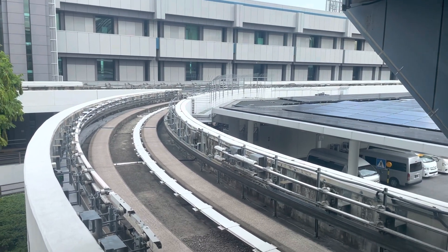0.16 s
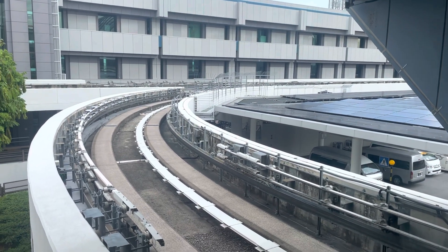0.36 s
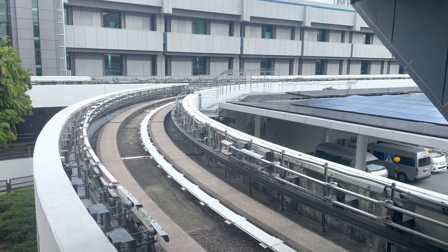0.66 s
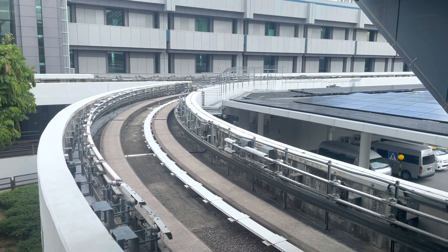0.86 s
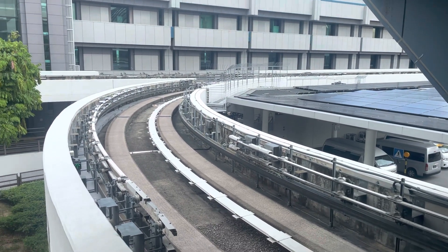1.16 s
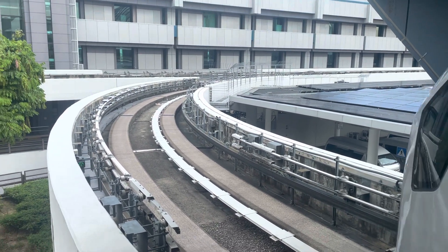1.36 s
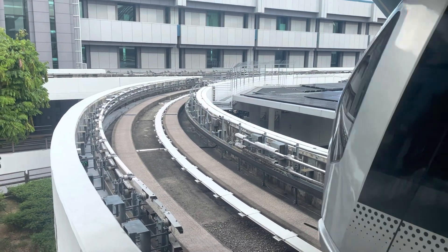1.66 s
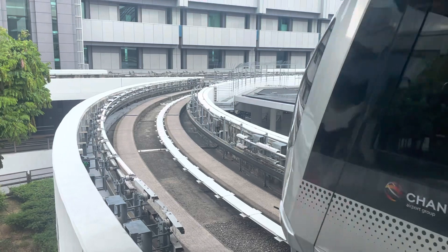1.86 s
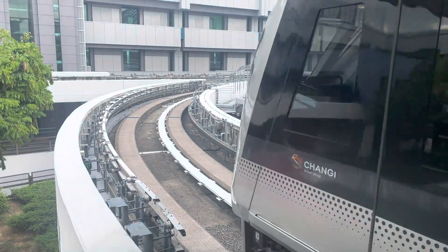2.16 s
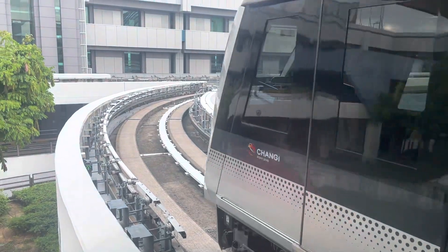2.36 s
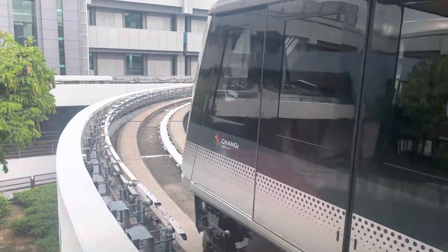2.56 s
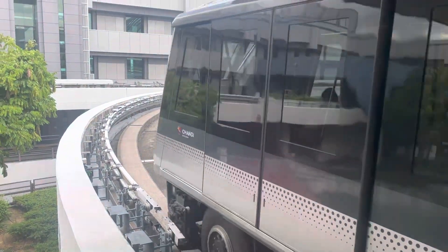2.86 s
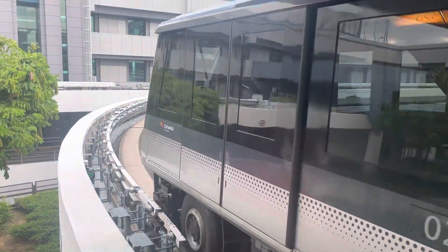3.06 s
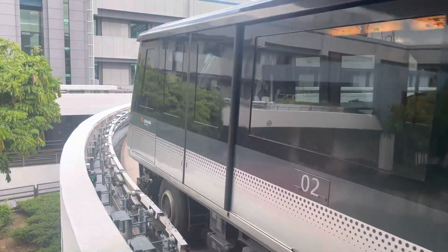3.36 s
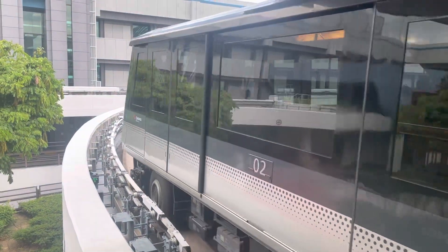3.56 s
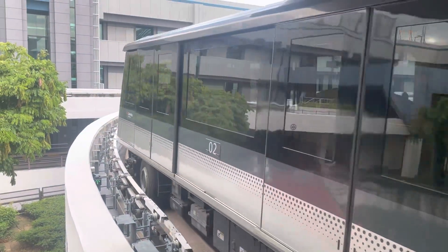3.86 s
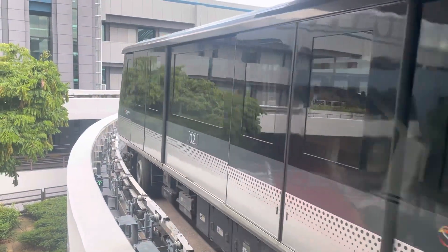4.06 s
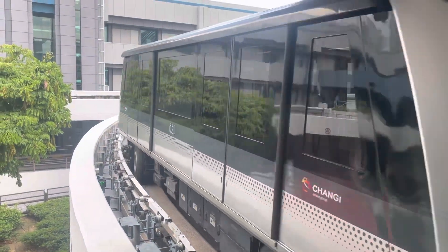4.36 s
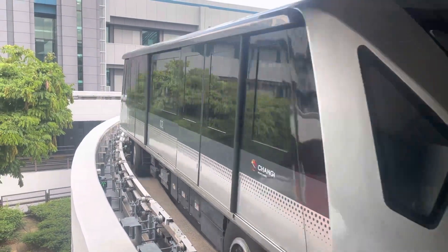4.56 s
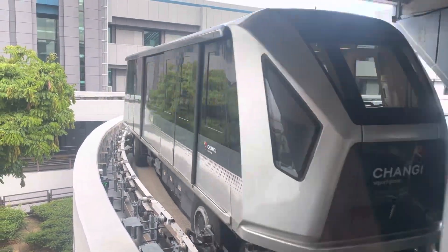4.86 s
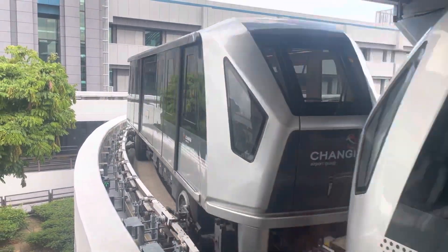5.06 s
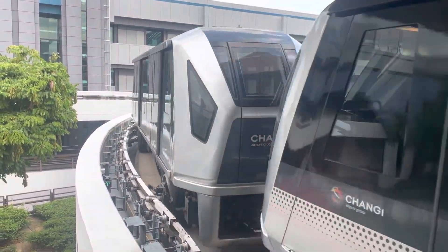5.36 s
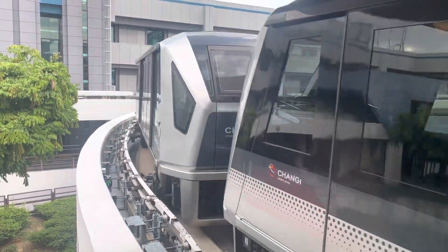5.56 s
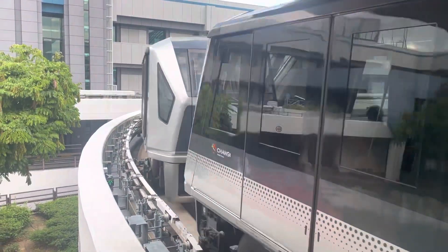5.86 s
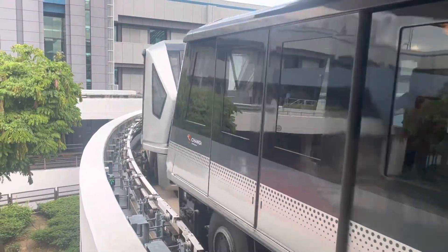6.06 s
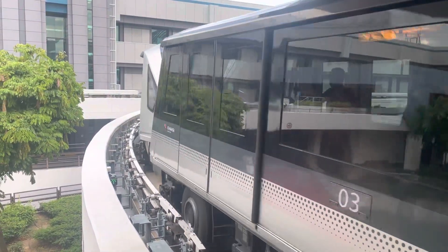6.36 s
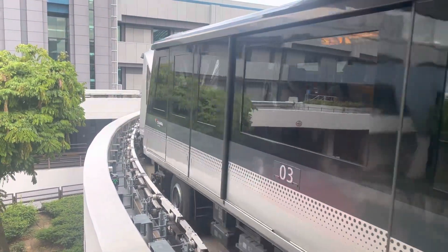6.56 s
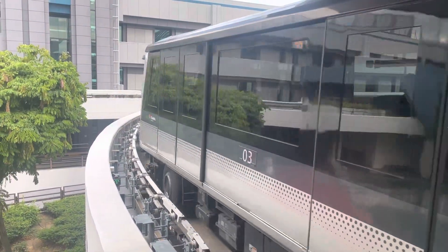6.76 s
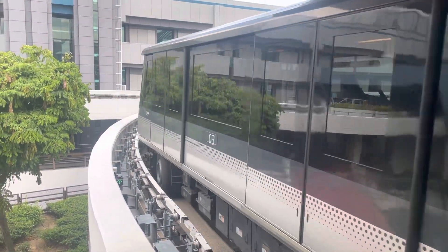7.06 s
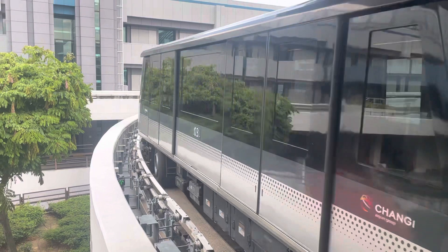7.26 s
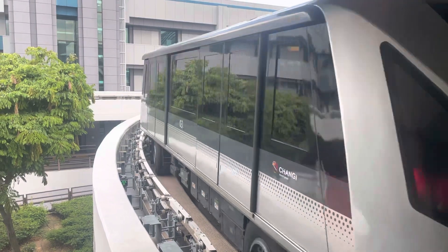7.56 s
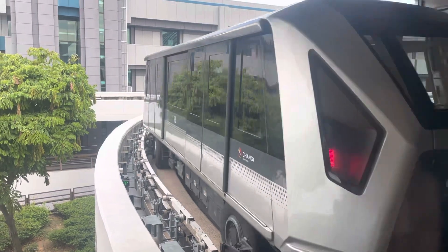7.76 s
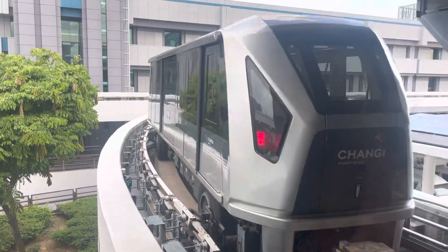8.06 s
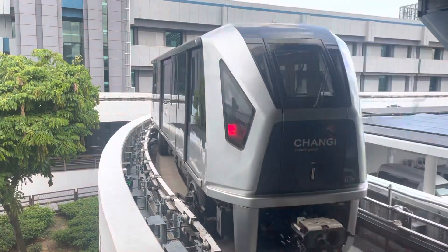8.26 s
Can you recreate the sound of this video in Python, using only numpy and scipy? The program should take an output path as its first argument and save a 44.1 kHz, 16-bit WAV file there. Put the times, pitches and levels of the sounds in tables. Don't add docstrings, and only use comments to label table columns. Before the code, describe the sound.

Outdoors beside a raised concrete guideway, a phone close to the track hears a two-car rubber-tyred train. Low deck rumble and tyre roar run throughout, with wavering motor hum and two broad whines. A thin brake squeal comes early, then soft joint thumps and engine revs from the street; later a small air spit, pump hum and a tiny chirp as the train recedes.

```python
import sys
import numpy as np
from scipy import signal
from scipy.fft import rfft, irfft, next_fast_len
from scipy.io import wavfile
from scipy.ndimage import uniform_filter1d

SR = 44100
rng = np.random.default_rng(int(sys.argv[2]) if len(sys.argv) > 2 else 0)


def master_out(mix):
    frames = np.transpose(np.atleast_2d(mix))
    ceiling = np.clip(frames, -1, 1)
    pcm = np.round(ceiling * 32767).astype(np.int16)
    wavfile.write(sys.argv[1], SR, pcm)


def gain_from_db(level_db):
    decades = np.asarray(level_db, float) / 20
    return 10 ** decades


N = 370440
TIME = np.arange(N) / SR

# t/s, nearness/dB, drive effort/dB
TRAIN = [(0.0, 0, -12.5), (0.5, 1, -15), (0.9, 0.5, -6.5), (1.8, 0.86, -2.5), (2.6, 1.5, -1), (3.6, 0, 1),
         (4.35, 0, -0.5), (5.26, -0.5, -0.2), (5.8, -1, 0), (6.35, -4, 0.5), (7.1, -4.5, -4.5),
         (7.6, -5, -6.5), (8.4, -10.5, -3.5)]
# level/dB, share of nearness [dB/dB], share of effort [dB/dB]
RUMBLE_LAW = (-26.5, 0.902, 0.017)
ROAR_LAW = (-37, 0.57, .03)
HISS_LAW = (-58, 0.52, 0.2)
WHINE_LAWS = [
    (-43.5, .1, 1.3),
    (-46.5, 0.96, .4),
]
FAN_LAW = (-48, 0.61, .03)
MAINS_LAW = (-41.5, .8, .1)
MOTOR_LAW = (-38.5, .5, .05)
OCTAVE_LAW = (-45, 0.71, -0.32)

# f/Hz, level/dB per Hz
RUMBLE = [(15, -40), (25, -18.5), (54, -8), (92, 2), (134, -1), (215, -3), (258, -9.5), (302, -10.5),
          (333, -19.5), (371, -16.5), (450, -18), (580, -47.5), (990, -120)]
# f/Hz, level/dB per Hz
ROAR = [(250, -25), (330, 0.5), (400, -4), (500, -5.5), (700, -5.5), (1000, -7.5), (1500, -14.5),
        (1900, -13), (2600, -19), (3300, -32), (3700, -47)]
# f/Hz, level/dB per Hz
HISS = [(2800, -15.5), (3500, 4.5), (4100, 3.5), (4650, 0.5), (4900, -3), (5600, -5), (7000, -9),
        (8500, -13.5), (9800, -17.5), (12000, -21.5), (13000, -30), (15000, -30), (16000, -33.5)]
# f/Hz, width/Hz, level/dB, steepness of the skirts [exponent]
WHINE_BANDS = [
    (2072, 290, -1.5, 3.3),
    (3004, 610, 2, 3.2),
]
# t/s, peak level/dB, half length/s
JOINTS = [
    (2.17, -27.5, 0.054),
    (2.8, -29, .12),
    (3.25, -27.5, 0.037),
    (3.48, -25, 0.038),
    (3.85, -27.5, .07),
    (4.0, -24, 0.029),
    (4.14, -27, 0.03),
    (4.42, -26.5, 0.057),
    (5.5, -27.5, .05),
]
# t/s, peak level/dB, half length/s
HISS_SWELLS = [
    (1.05, -63, 0.19),
    (1.75, -58.5, 0.3),
    (5.56, -55, .045),
    (7.6, -66, .35),
]

# t/s, peak level/dB, half length/s
FAN_SWELLS = [(0.0, -41, 0.12), (1.1, -40.5, 0.41), (2.8, -41.5, .6), (3.5, -46.5, .3), (4.8, -46, 0.33),
              (5.9, -50, .3), (6.8, -42.5, .2), (7.9, -49, 0.18)]
# t/s, peak level/dB, half length/s
MAINS = [(.6, -39.5, -0.5), (2.3, -37, 0.6), (3.65, -37, .08), (4.5, -34, -0.3), (6.0, -37.5, 1.1)]
# t/s, peak level/dB, half length/s
MOTOR = [(.42, -33.5, .17), (.95, -28.5, 0.17), (2.32, -31, .1), (2.92, -32.5, .13), (3.5, -25, 0.072),
         (3.77, -26, 0.086), (4.07, -31.5, 0.075), (4.36, -35, 0.045), (4.89, -31, 0.15),
         (5.75, -27.5, 0.222), (6.08, -31.5, 0.053), (6.5, -31.5, 0.227), (7.25, -31.5, 0.19)]
# t/s, peak level/dB, half length/s
MOTOR_OCTAVE = [(1.19, -34, 0.075), (1.63, -33.5, .12), (2.11, -36, 0.049), (2.53, -38, .1),
                (2.97, -32.5, .06), (3.73, -33, 0.058), (3.98, -33, .1), (4.35, -32.5, 0.016),
                (4.62, -36.5, .15), (4.94, -35.5, 0.042), (7.5, -44.5, 0.31)]
# t/s, peak level/dB, half length/s
DECK = [
    (1.75, -27.5, 0.095),
    (2.2, -27, 0.12),
    (2.75, -32.5, .15),
    (3.2, -32.5, .15),
]
# t/s, peak level/dB, half length/s
PUMP = [
    (5.2, -54.5, .08),
    (5.48, -50.5, .08),
    (6.0, -48.5, .5),
]
# t/s, f/Hz, level/dB
GEAR = [
    (0, 378, -42),
    (.3, 380.7, -37.5),
    (.75, 378.3, -36.5),
    (1.1, 383, -45),
    (1.4, 376, -50),
]
# t/s, f/Hz, level/dB
PING = [
    (6.6, 10000, -98),
    (7.0, 10000, -92),
    (7.9, 10000, -90),
    (8.4, 10000, -89),
]
# t/s, f/Hz, level/dB
SQUEAL = [
    (.95, 2476, -60),
    (1.05, 2480, -47),
    (1.27, 2482, -47),
    (1.36, 2478, -52),
    (1.55, 2478, -54),
    (1.75, 2478, -59),
]

# f/Hz, level/dB per Hz
AIR_COLOUR = [(2500, -27), (3500, 15), (5000, 8.5), (7000, 6), (9000, -1), (11000, 1.5), (13000, -5),
              (15500, -2.5), (16000, -7)]
# t/s, peak level/dB, half length/s
LEAKS = [
    (5.33, -72.5, .08),
    (5.57, -61, 0.055),
    (5.7, -72, .35),
    (6.0, -71, .1),
]
# t/s, level/dB, decay/s
SPITS = [
    (5.452, -64, .06),
    (5.525, -63, .05),
    (5.812, -60, 0.028),
    (5.908, -67, .025),
    (6.03, -71, .04),
]
# t/s, level/dB, f/Hz, length/s
CHIRPS = [
    (7.489, -56, 7020, 0.013),
]

# t/s, peak level/dB, half length/s
REVS = [
    (2.1, -36, .12),
    (2.43, -24.5, 0.087),
    (2.72, -29, .18),
    (3.17, -25.5, 0.1),
    (3.5, -29.5, 0.13),
    (4.05, -31, .1),
    (4.4, -33, 0.14),
]
# t/s, f/Hz, level/dB
IDLE = [
    (7.4, 68.4, -42.5),
    (7.6, 69.3, -45),
    (8.0, 71.2, -39),
    (8.4, 71.3, -38),
]
# t/s, peak level/dB, half length/s
TRAFFIC = [
    (.75, -45, .3),
    (8.35, -43.5, .2),
]

# f/Hz, likeness [0..1]
SAME = [(60, .92), (200, .93), (400, .63), (570, .4), (800, .5), (1500, .15), (2100, .68), (3000, .62),
        (4200, .62), (5200, .45), (6000, .62), (7500, .7), (10000, .75)]
# f/Hz, phase/rad
LEAD = [(300, 0), (600, .8), (1400, 1.1), (1900, 0), (2900, -.55), (4000, -.2), (5100, -.5), (6000, .35),
        (7000, 1.3), (8300, 3.1), (11700, 6.3), (14600, 9.4)]
# f/Hz, level/dB
LEFT = [(200, -.5), (400, 1.5), (700, -.5), (1300, 3.5), (1800, 2), (3200, 4.5), (4200, 1.5), (5500, 2.5),
        (7500, 0)]
# from f/Hz, to f/Hz
MID_GAPS = [
    (7700, 8900),
    (13800, 23000),
]
# from f/Hz, to f/Hz
SIDE_GAPS = [
    (10350, 13000),
    (15300, 23000),
]
# f/Hz, level/dB
FAINT_LIMIT = [(7000, -125), (8500, -101), (12000, -101), (13000, -104), (15000, -104)]


def rolling(hz, t):
    deck = shape(RUMBLE, hz) * swells(JOINTS, t, follows(RUMBLE_LAW, t))
    tyres = shape(ROAR, hz) * swells(TRAFFIC, t, follows(ROAR_LAW, t)) * gain_from_db(2.0)
    treads = shape(HISS, hz) * swells(HISS_SWELLS, t, follows(HISS_LAW, t)) * gain_from_db(1.5)
    layers = [deck, tyres, treads, fan(hz, t)]
    for (centre, width, db, steep), law in zip(WHINE_BANDS, WHINE_LAWS):
        hump = 1 / (1 + abs(2 * (hz - centre) / width) ** steep)
        layers.append(evened(hump)[:, None] * follows(law, t) * gain_from_db(db))
    return np.sqrt(sum(layer ** 2 for layer in layers))


def drives():
    mains = swells(MAINS, TIME, follows(MAINS_LAW, TIME))
    motor = swells(MOTOR, TIME, follows(MOTOR_LAW, TIME))
    octave = swells(MOTOR_OCTAVE, TIME, follows(OCTAVE_LAW, TIME))
    blades = swells(FAN_SWELLS, TIME, follows(FAN_LAW, TIME)) * gain_from_db(-5.0)
    out = tone(50.76, mains, width_hz=6.0, rough=.5, drift_hz=1.2)
    out += tone(148.15, motor, width_hz=14.0, rough=.35, drift_hz=2.0)
    out += tone(303.03, octave, width_hz=20.0, rough=.18, drift_hz=2.0)
    out += tone(120.2, swells(DECK, TIME), width_hz=8.0, rough=.2, drift_hz=4.0)
    out += tone(*curve(GEAR), width_hz=30.0, rough=.8)
    out += tone(563.0, swells(PUMP, TIME), width_hz=15.0, rough=.5, drift_hz=3.0)
    out += tone(*curve(PING), width_hz=400.0, rough=.95)
    out += tone(857.0 - TIME, blades, width_hz=10.0, rough=.3, drift_hz=3.0)
    squeal_hz, squeal = curve(SQUEAL)
    out += tone(squeal_hz, squeal, width_hz=110.0, rough=.42)
    return out + tone(2 * squeal_hz, squeal * gain_from_db(-22.0), width_hz=160.0, rough=.97)


def fan(hz, t):
    centre = 857.0 - 1.0 * t
    ring = 1 / (1 + (2 * (hz[:, None] - centre) / 24.0) ** 2)
    return evened(ring, 0) * swells(FAN_SWELLS, t, follows(FAN_LAW, t)) * gain_from_db(-0.4)


def valve():
    spits = 0
    for s, db, decay in SPITS:
        spits = spits + gain_from_db(2 * db) * (TIME > s) * np.exp(-2 * abs(TIME - s) / decay)
    seep_db = -91
    flow = np.sqrt(swells(LEAKS, TIME, gain_from_db(seep_db)) ** 2 + spits)
    air = noise(lambda hz, t: shape(AIR_COLOUR, hz), size=512, patchy_db=-1.5)
    return gain_from_db(9.0) * flow * air


def shoe():
    out = np.zeros(N)
    for s, db, hz, length in CHIRPS:
        u = np.clip((TIME - s) / length, 0, 1)
        pair = np.sin(2 * np.pi * hz * TIME) + 1.5 * np.sin(np.pi * hz * TIME)
        out += gain_from_db(db) * np.sin(np.pi * u) ** 0.36 * pair
    return out


def street_engine():
    from_s, from_hz, to_hz, rise_s = 1.9, 51.0, 71.1, .9
    hz = to_hz - (to_hz - from_hz) * np.exp(-np.maximum(TIME - from_s, 0) / rise_s)
    level = swells(REVS, TIME)
    firing = tone(hz, level, width_hz=3.0, rough=.06)
    octave = tone(2 * hz, level * gain_from_db(-8.0), width_hz=8.0, rough=.4)
    return firing + octave + tone(*curve(IDLE), width_hz=3.0, rough=.08)


def follows(law, t):
    near_db, effort_db, _ = columns(TRAIN, t)
    db, by_near, by_effort = law
    return gain_from_db(db + by_near * near_db + by_effort * effort_db)


def swells(rows, t, steady=0):
    bells = sum(gain_from_db(2 * db) * np.exp(-((t - s) / half) ** 2) for s, db, half in rows)
    return np.sqrt(steady ** 2 + bells)


def curve(rows):
    hz, db, gate = columns(rows, TIME)
    return hz, gate * gain_from_db(db)


def columns(rows, t):
    s, *values = np.transpose(rows)
    since_start = t - s[0] + (s[0] < .05)
    until_end = s[-1] - t + (s[-1] > 8.3)
    gate = np.clip(np.minimum(since_start, until_end) / .06, 0, 1)
    return [np.interp(t, s, v) for v in values] + [gate]


def tone(hz, level, width_hz, rough, drift_hz=0):
    if drift_hz:
        hz = hz + drift_hz * wander(1.988)
    else:
        hz = hz + np.zeros(N)
    smear = (wander(width_hz / 2) + 1j * wander(width_hz / 2)) / np.sqrt(2)
    rough = np.clip(rough, 0, 1)
    swing = np.sqrt(1 - rough) + np.sqrt(rough) * smear
    turning = np.exp(2j * np.pi * np.cumsum(hz) / SR)
    return np.sqrt(2) * level * (swing * turning).real


def wander(rate_hz):
    pole = np.exp(-4 * np.pi * rate_hz / SR)
    return evened(signal.sosfilt([[1, 0, 0, 1, -pole, 0]] * 3, rng.standard_normal(N)))


def noise(magnitude, size, patchy_db):
    hz, t, z = signal.stft(rng.standard_normal((2, N)), SR, nperseg=size, noverlap=size * 3 // 4)
    same = np.clip(read(SAME, hz), 0, 1)[:, None]
    z[1] = same * z[0] + np.sqrt(1 - same ** 2) * z[1]
    patches = uniform_filter1d(rng.standard_normal(z.shape[1:]), size=3, axis=0)
    patches = evened(uniform_filter1d(patches, size=12, axis=1))
    z *= magnitude(hz, t) * gain_from_db(patchy_db * patches)
    return signal.istft(z, SR, nperseg=size, noverlap=size * 3 // 4)[1][:, :N]


def shape(points, hz):
    inside = (hz > points[0][0]) * (hz < points[-1][0])
    return evened(gain_from_db(read(points, hz)) * inside)[:, None]


def read(points, hz):
    f, value = np.transpose(points)
    return np.interp(np.log(hz + 1), np.log(f + 1), value)


def evened(x, axis=None):
    return x / np.sqrt(np.mean(x ** 2, axis, keepdims=True) + 1e-30)


def scene():
    wash = noise(rolling, size=2048, patchy_db=1.3)
    return wash + drives() + valve() + shoe() + street_engine()


def dropped(x, gaps):
    hz, t, z = signal.stft(x, SR, nperseg=2048, noverlap=1536)
    patch = uniform_filter1d(uniform_filter1d(abs(z) ** 2, size=3, axis=0), size=3, axis=1)
    around = abs(uniform_filter1d(uniform_filter1d(patch, size=25, axis=0), size=5, axis=1))
    limit = around ** .7 * gain_from_db(2 * read(FAINT_LIMIT, hz))[:, None] ** .3
    luck = rng.standard_normal((len(t) // 3 + 1, len(hz) // 32 + 1))
    luck = luck.repeat(3, axis=0).repeat(32, axis=1)[:len(t), :len(hz)].T
    limit = limit * gain_from_db(5.0 * luck * (hz[:, None] > 8000))
    z[patch < limit] = 0
    for low, high in gaps:
        jump = np.repeat(rng.exponential(200.0, (len(t), 2)), 3, axis=0)[:len(t)]
        z[(hz[:, None] > low - jump[:, 0]) & (hz[:, None] < high + jump[:, 1])] = 0
    return signal.istft(z, SR, nperseg=2048, noverlap=1536)[1][:N]


def roll_off(x):
    return signal.sosfilt(signal.butter(12, 16000, fs=SR, output="sos"), x)


def record(dry):
    size = next_fast_len(N + 4096)
    hz = np.fft.rfftfreq(size, 1 / SR)
    left, right = rfft(dry, size)
    tilt = gain_from_db(read(LEFT, hz) / 2)
    left = irfft(left * tilt, size)[:N]
    right = irfft(right / tilt * np.exp(1j * read(LEAD, hz)), size)[:N]
    mid = dropped((left + right) / 2, MID_GAPS)
    side = dropped((left - right) / 2, SIDE_GAPS)
    return roll_off(np.array([mid + side, mid - side]))


dry = scene()
out = record(dry)
master_out(out)
```